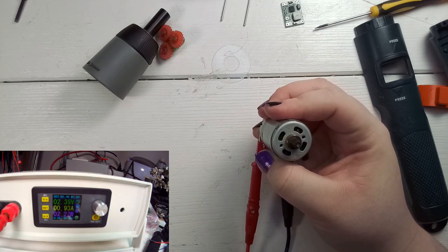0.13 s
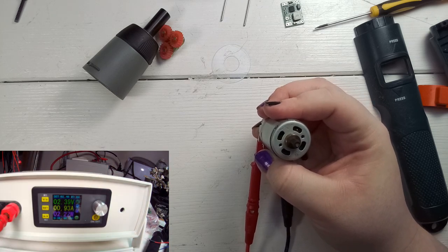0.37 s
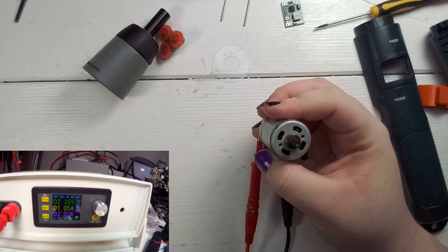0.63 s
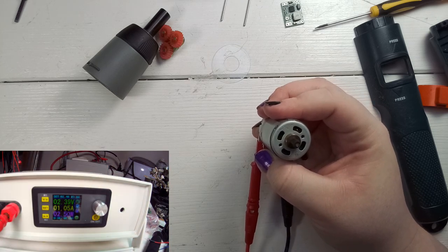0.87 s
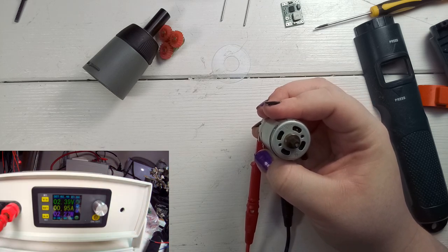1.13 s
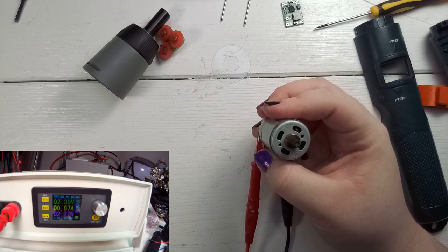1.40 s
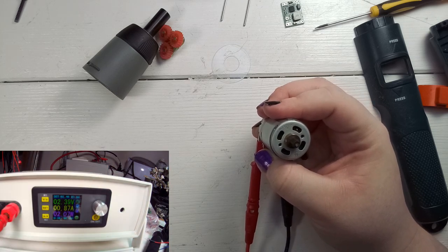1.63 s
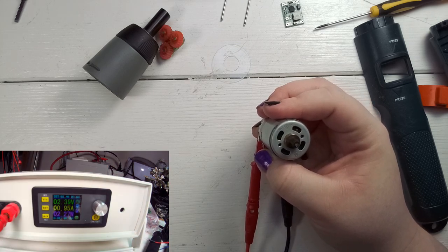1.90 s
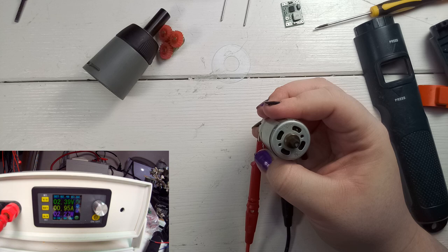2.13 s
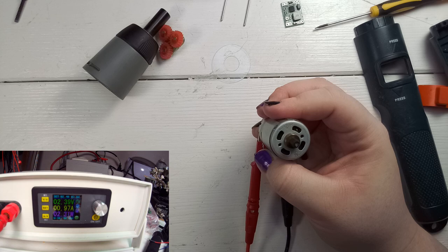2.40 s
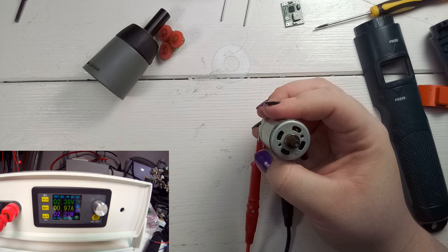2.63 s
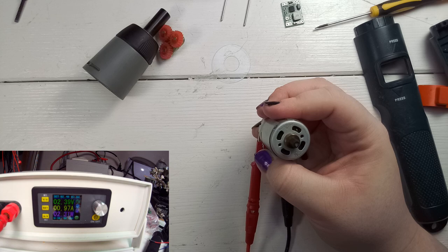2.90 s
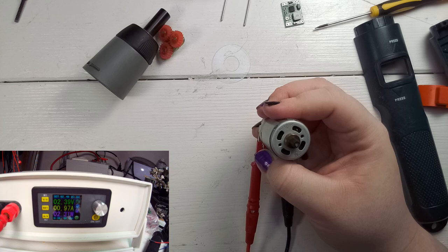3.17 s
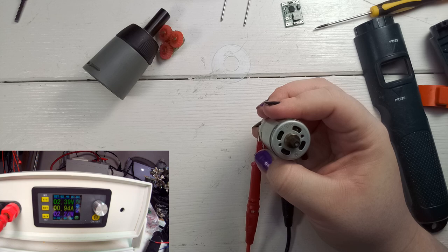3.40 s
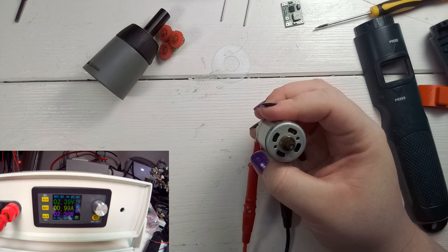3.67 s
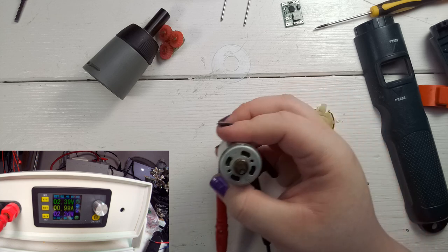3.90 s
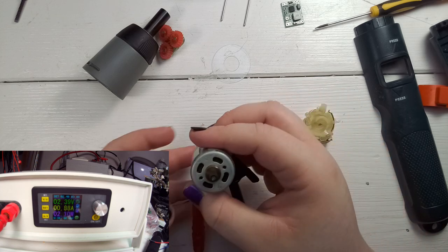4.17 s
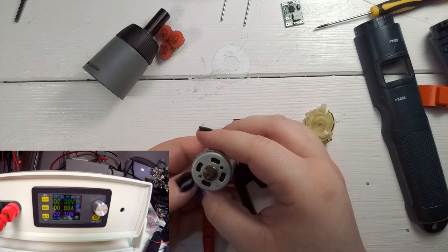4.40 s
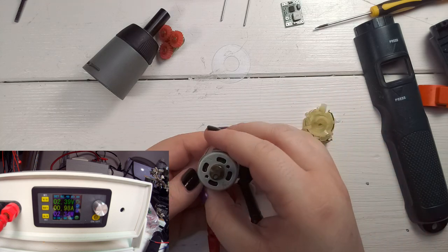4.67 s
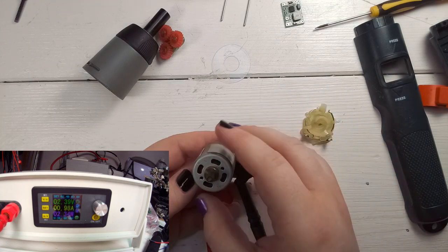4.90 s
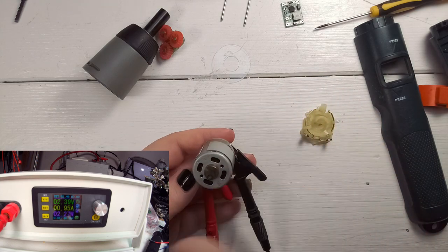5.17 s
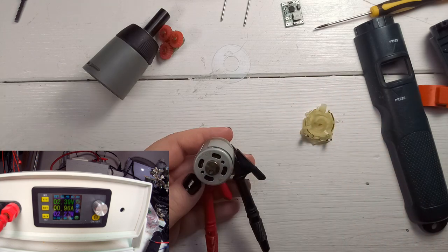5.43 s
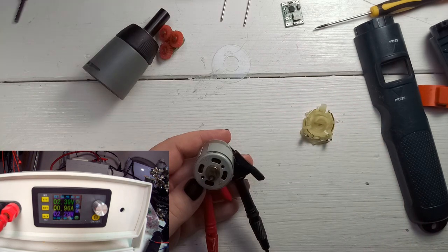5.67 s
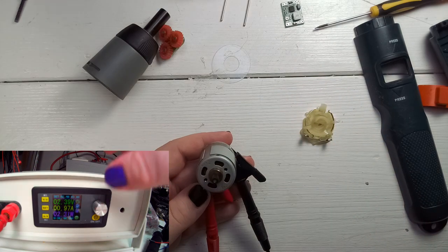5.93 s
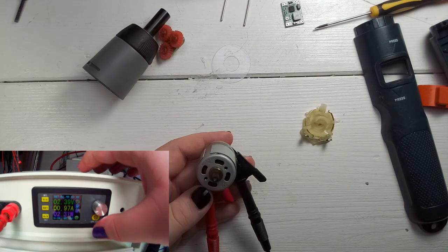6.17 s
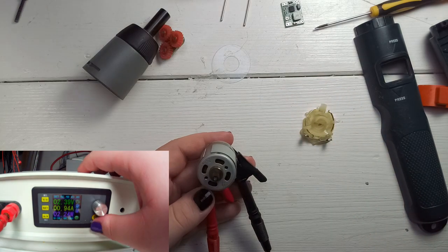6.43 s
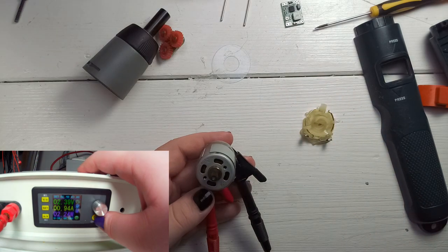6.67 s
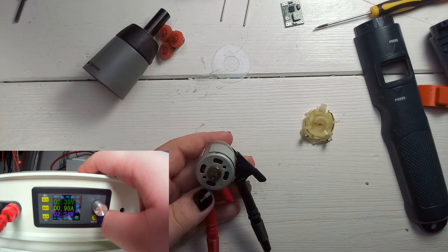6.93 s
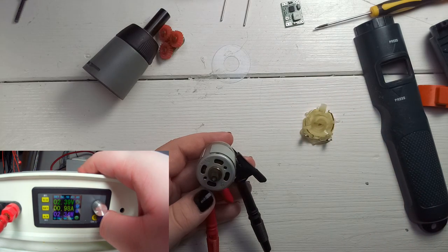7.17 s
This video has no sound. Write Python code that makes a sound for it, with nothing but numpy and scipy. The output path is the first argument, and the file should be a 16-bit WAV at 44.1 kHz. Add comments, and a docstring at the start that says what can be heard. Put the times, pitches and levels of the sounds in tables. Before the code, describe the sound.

Close, dry indoor sound of a tiny motor already spinning without load: rapid brush ticks fused into a hissing, ringing buzz, over a buzzy whine. Pitch rises slightly and wobbles whenever something briefly drags. Halfway through, handling changes the metal ring, with flickers of a coarser octave-lower rasp, light knocks on a bench and soft fabric rubs. The buzz continues to the end, softer, with faint hum and room noise.

```python
"""Small brushed motor held in a hand

A small brushed motor runs unloaded above a bench, its speed creeping up and sagging now and then.
Brushes tick over the commutator bars and scrape, ringing the steel can; clean tones follow the shaft.
The hand turns and partly covers the motor, which changes the ring and the balance of the tones.
Mains hum from sine waves and a faint room floor from filtered noise lie underneath.
Damped swings and clicks make a few bumps on the bench; filtered noise makes a sleeve's rustle."""
import sys
import numpy as np
from scipy import signal
from scipy.fft import rfft, irfft
from scipy.io import wavfile
from scipy.ndimage import uniform_filter1d

SR = 44100
rng = np.random.default_rng(int(sys.argv[2]) if len(sys.argv) > 2 else 0)


def elevation(decibels):
    """Turn decibel levels (scalar or array-like) into linear amplitude ratios."""
    levels = np.asarray(decibels, float)
    return 10 ** (levels / 20)


def to_wav(s):
    """Save 16-bit WAV."""
    ch = np.atleast_2d(s).T  # columns
    pcm = np.round(np.clip(ch, -1, 1) * 32767)  # PCM
    wavfile.write(sys.argv[1], SR, pcm.astype(np.int16))


N = 322282

# Speed of the free shaft, before drags and wobble: time_s, speed_turns_per_s
SHAFT_SPEED = [(0, 142.9), (.12, 145.2), (.5, 145.7), (.68, 148.4), (1.12, 148.8), (1.3, 152.1),
               (2.6, 155.4), (3.6, 155.1), (4.8, 158.2), (5.6, 157.2), (5.78, 158.8), (6.3, 160.4),
               (7.14, 161.1), (7.22, 162.4)]
# Something drags on the rotor, then lets go: release_s, lost_turns_per_s, drag_s, recovery_s
DRAGS = [(.826, 5.1, .131, .035), (1.177, 2.7, .025, .085), (1.418, 3, .157, .063),
         (1.564, 5.6, .106, .065), (1.925, 2.5, .029, .11), (2.075, 3.9, .061, .134),
         (2.429, 5.1, .046, .051), (3.25, 1.6, .022, .02), (3.711, 3.9, .045, .281),
         (4.119, 4.3, .139, .105), (4.281, 7.7, .077, .07), (4.415, 5.1, .052, .3),
         (5.331, 7.4, .075, .054), (6.166, 2.1, .078, .055), (6.411, 7.6, .059, .051)]
# How the motor is held: time_s, grip (0 facing the microphone, 1 cupped in both hands,
# 2 held low and aside), limp (0 to 1, how far the ticks alternate strong and weak)
HAND_GRIP = [(0, .1, .02), (3.9, .08, .02), (4.25, .4, .05), (4.55, 1, .05), (4.7, 1, .55), (4.83, 1, .5),
             (4.9, 1, .1), (5.12, 1, .1), (5.18, 1, .65), (5.3, 1, .55), (5.4, 1.05, .1), (5.6, 1.15, .1),
             (5.67, 1.2, .5), (5.9, 1.3, .55), (5.93, 1.3, .08), (6.04, 1.4, .1), (6.1, 1.9, .5),
             (6.4, 1.95, .2), (6.6, 1.95, .5), (7.15, 1.95, .5), (7.22, 1.95, .1)]
# Brush ticks within one turn: place_turns, level_db (relative)
BRUSH_TICKS = [(0, 0), (.23, -5), (0.52, -9), (0.85, -7)]
# Ring of the can, one list for each whole grip: pitch_hz, level_db (relative)
CAN_RING = [
    [(2120, -46), (3600, -13), (3970, -23.5), (4790, -14), (5190, -27), (5800, -14.5), (6250, -2.5),
     (6700, 1.5), (7560, -5), (8180, -16), (9300, -8), (13600, -33), (14400, -18), (15400, -17)],
    [(2120, -28), (3600, -21.5), (4590, -21.5), (4850, -8.5), (5300, -13.5), (5720, -6.5), (6340, -4),
     (7290, -9.5), (7840, -17.5), (10900, -25.5), (12100, -31.5), (15400, -29.5)],
    [(2120, -57), (3600, -20.5), (4400, -17), (4970, 2), (5540, -8.5), (6300, 1), (7030, 1), (7330, -6),
     (9470, -3.5), (13500, -29.5), (15400, -15)],
]
# Level of the ticks and scrape as rung by the can: time_s, level_db
BUZZ_LEVEL = [(0.0, -41), (1.55, -38.5), (1.61, -40.5), (1.85, -38.5), (2.56, -38.5), (2.73, -37),
              (3.4, -38), (3.58, -36.5), (4.34, -41), (4.56, -37), (4.82, -39), (5.01, -36), (5.05, -40),
              (5.19, -38), (5.39, -43), (5.45, -39), (5.68, -42.5), (6.07, -45), (7.31, -45.5)]
# Level of one mode of the can, freed or damped by the fingers: time_s, level_db
WHISTLE_LEVEL = [(4.4, -63), (4.52, -45), (5.25, -61), (5.37, -77), (5.45, -55), (6.02, -48.5), (6.08, -63),
                 (7.3, -54.5)]
# Magnetic and bearing tones, one row per multiple of the shaft speed from the third up:
# facing_db, cupped_db, aside_db (relative)
SHAFT_TONES = [(-14.5, -10, -15), (-11.5, -8, -26), (-19, -7, -11), (-18, -17, -10.5), (-6, -7.5, -10.5),
               (-34, -58, -52), (4, -4, 0.5), (1, -4, -8.5), (-3.5, -1.5, -3), (1.5, -13, -4.5),
               (-1.5, -1, -17.5), (-12.5, -5.5, -11), (-5.5, -0.5, -0.5), (-4, -8, -7), (-11.5, 2.5, -22),
               (-32, -12, -3.5), (-11.5, -7, -6), (-0.5, -3, 0.5), (-14, -31, -20), (4, -17, -13)]
# Spells in which one tone comes up or drops out: multiple, start_s, end_s, change_db
TONE_SPELLS = [(6, .56, 1.6, 9), (19, 5.92, 6.07, 11), (7, 0, 1, -7), (21, 1.65, 3.7, 6),
               (22, 2.45, 3.7, -9), (19, 6.26, 7.4, 10), (9, 6.12, 6.36, 5)]
# Level of all the shaft tones together: time_s, level_db
TONE_LEVEL = [(0, -51), (2.4, -51), (2.6, -51), (3.65, -51), (4.15, -55.5), (4.6, -55.5), (7.31, -53)]
# Mains hum: pitch_hz, level_db (rms)
MAINS_HUM = [(50, -71), (150, -70), (250, -76.5), (350, -82), (450, -78), (650, -80)]
# Colour of the room floor: pitch_hz, level_db (relative, per Hz)
FLOOR_COLOUR = [(20, -25), (60, -8), (120, -13), (300, -7), (700, -5), (1100, -11), (3500, -17),
                (6000, -40)]
# Bumps on the bench: start_s, level_db, swing_hz, click_top_hz, fade_s (time to fall 60 dB)
BENCH_BUMPS = [(3.743, -41.5, 325, 900, 0.036), (4.175, -34, 1720, 3800, 0.015),
               (4.404, -41, 337, 600, 0.028), (5.154, -36, 160, 1710, 0.0098),
               (5.43, -33.5, 330, 875, 0.011), (6.075, -45, 100, 250, 0.054),
               (6.277, -40, 720, 1100, 0.007)]
# Sleeve strokes on the bench: start_s, length_s, dull_rub_db, bright_swish_db
SLEEVE_STROKES = [(3.75, 0.33, -64.5, -59.5), (4.007, 0.6, -63.5, -59), (5.244, 0.66, -58, -54.5),
                  (5.602, 0.81, -54.5, -54), (6.176, 0.68, -64, -61), (6.53, 1, -66.5, -59.5)]
# Colour of the dull rub: pitch_hz, level_db (relative, per Hz)
RUB_COLOUR = [(30, -14), (80, -1), (300, -4), (750, -1), (1200, -11), (2800, -14), (4000, -28), (8000, -60)]
# Colour of the bright swish: pitch_hz, level_db (relative, per Hz)
SWISH_COLOUR = [(600, -42.5), (1400, 2.5), (2500, -1), (3600, 2.5), (6000, -51)]


def evened(x):
    """Scales to rms 1."""
    return x / np.sqrt(np.mean(x ** 2) + 1e-20)


def curve(rows):
    """Draws each column of a table as a line through time, sample by sample."""
    s, *columns = np.transpose(rows)
    return [np.interp(np.arange(N) / SR, s, column) for column in columns]


def colour(x, points, causal=True):
    """Filters to a given spectrum; its ring follows the blow, or swells and fades evenly."""
    hz, db = np.transpose(points)
    f = np.abs(np.fft.fftfreq(4096, 1 / SR))
    log_gain = np.log(elevation(np.interp(np.log(f + 1), np.log(hz + 1), db)))
    # the Hilbert transform gives the phase that puts the ring after the blow
    spectrum = np.exp(np.conj(signal.hilbert(log_gain)) if causal else log_gain)
    taps = np.fft.fftshift(np.fft.ifft(spectrum).real)
    return signal.oaconvolve(x, taps / np.linalg.norm(taps), "same")


def drift(count, s, fastest_hz):
    """Slow random wandering of rms 1 from summed sines, one row each, at the times s."""
    hz = np.geomspace(.2, fastest_hz, 16)[:, None]
    start = rng.random((count, 16, 1))
    waves = np.sin(2 * np.pi * (hz * s + start)) / hz ** .15
    return evened(waves.sum(1))


def shaft():
    """Adds up speed into turns so far, and finds how hard a catching brush brakes the rotor."""
    catch_s = .05  # drags shorter than this are a brush catching
    t = np.arange(N) / SR
    speed, = curve(SHAFT_SPEED)
    braking = np.zeros(N)  # turns per s per s
    for release, lost, drag_s, recovery_s in DRAGS:
        slowing = np.clip(1 + (t - release) / drag_s, 0, 1)
        recovering = np.exp(-abs(t - release) / recovery_s)
        speed = speed - lost * np.where(t < release, slowing, recovering)
        dragging = (t < release) * (t > release - drag_s)
        braking = braking + lost / drag_s * dragging * (drag_s < catch_s)
    # the light rotor never runs quite evenly
    wander = uniform_filter1d(uniform_filter1d(rng.standard_normal(N), 1500), 800)
    wobble = 1 + .0016 * evened(wander)
    turns = np.cumsum(uniform_filter1d(speed, 1000) * wobble) / SR
    return turns, uniform_filter1d(braking, 400)


def brush_ticks(turns, limp):
    """Short clicks that repeat every turn, creeping in place and strength: all, and the main one."""
    limp_share = .9  # share of the limp that reaches the ticks
    place, db = np.transpose(BRUSH_TICKS)[:, :, None]
    count = len(BRUSH_TICKS)
    whole = np.arange(int(turns[-1]) - 1)
    s = np.interp(whole, turns, np.arange(N) / SR)
    scatter = rng.standard_normal((len(whole), 2, count)).T
    angle = whole + place + .003 * drift(count, s, 3) + .0004 * scatter[:, 0]
    size = elevation(db + 1.1 * drift(count, s, 6) + .4 * scatter[:, 1])
    # each bar ticks strong and weak in turn: this adds lines halfway between the multiples
    alternate = (-1) ** (whole + np.arange(count)[:, None])
    size *= 1 + alternate * limp_share * limp[(s * SR).astype(int)]
    # a windowed sinc places each click between samples
    at = np.interp(angle, turns, np.arange(N))[..., None] + 16
    near = np.floor(at) + np.arange(-15, 17)
    window = np.cos(np.pi * (near - at) / 32) ** 2
    clicks = size[..., None] * np.sinc(near - at) * window
    every, main = np.zeros((2, N + 64))
    np.add.at(every, near.astype(int), clicks)
    np.add.at(main, near[0].astype(int), clicks[0])
    return evened(every[:N]), evened(main[:N])


def brush_scrape(turns, grip, limp, braking):
    """Friction hiss, strongest just after the main tick of each turn and when a brush catches."""
    # level against the ticks: 1 dB per grip, 5 dB per limp, .085 dB per unit of braking
    scrape_db = -12 + 1 * grip + 5 * limp + .085 * braking
    pulse = 1 + .6 * np.cos(2 * np.pi * turns - 1)
    return elevation(scrape_db) * pulse * rng.standard_normal(N)


def shell(x, ring_db, count=3):
    """The can's dense short ring scatters each tick; the ring changes slowly as fingers shift."""
    t = np.arange(2500) / SR
    rings = rfft(rng.standard_normal((count, len(t))) * elevation(-60 * t / .055))
    # many modes overlap, so no single one stands out far
    rings = irfft(rings / abs(rings) ** .93)
    rings /= np.linalg.norm(rings, axis=1, keepdims=True)
    s = np.arange(0, N + 256, 256) / SR
    weights = drift(count, s, 4)
    weights /= np.linalg.norm(weights, axis=0)
    # the top of each tick only leaves through the can
    direct = signal.lfilter(*signal.butter(4, 7900, fs=SR), x)
    scattered = np.zeros(N)
    for weight, ring in zip(weights, rings):
        scattered += np.interp(np.arange(N) / SR, s, weight) * signal.oaconvolve(x, ring)[:N]
    return direct + elevation(ring_db) * scattered


def can_buzz(ticks, scrape, grip):
    """Ticks and scrape ring the can, whose resonances blend from one grip to the next."""
    drive = shell(ticks + scrape, -5.5 + 5.5 * grip)  # more scatter in covering hands
    ring = np.zeros(N)
    for k, can in enumerate(CAN_RING):
        share = np.clip(1 - abs(grip - k), 0, 1)
        ring += np.sqrt(share) * evened(colour(drive, can, causal=False))
    buzz_db, = curve(BUZZ_LEVEL)
    # the ring follows the buzz level
    return elevation(buzz_db) * ring / np.sqrt(uniform_filter1d(ring ** 2, 6000))


def can_whistle(main_tick, scrape):
    """One mode of the can, a narrow resonance rung by the main tick and the scrape."""
    whistle_hz, width_hz = 4990, 330  # width of each of two passes
    mode = signal.iirpeak(whistle_hz, whistle_hz / width_hz, SR)
    ringing = signal.lfilter(*mode, signal.lfilter(*mode, main_tick + scrape))
    level_db, = curve(WHISTLE_LEVEL)
    return elevation(level_db) * evened(ringing)


def rotor_tones(turns, grip, limp):
    """Clean tones on low multiples of the shaft speed, each swelling and fading on its own."""
    lowest_multiple = 3
    lag, spread = .4, .027  # shares of a turn: tones line up this long after the main tick, or a bit before
    s = np.arange(0, N + 256, 256) / SR
    held = grip[::256]
    steps = len(held)
    waver_db = np.interp(held, range(2), (2.5, 3.5))  # less steady in moving hands
    tones = np.zeros(N)
    wavers = drift(len(SHAFT_TONES), s, 12)
    for k, (by_grip_db, waver) in enumerate(zip(SHAFT_TONES, wavers), lowest_multiple):
        db = np.interp(held, range(3), by_grip_db) + waver_db * waver[:steps]
        for multiple, start, end, change_db in TONE_SPELLS:
            if multiple == k:
                inside = 1. * (s > start) * (s < end)
                db = db + change_db * uniform_filter1d(inside, size=9)[:steps]
        # the limp shows here too
        limping = 1 + .5 * limp * np.cos(np.pi * turns + 2 * np.pi * rng.random())
        strength = np.interp(np.arange(N) / SR, s[:steps], elevation(db))
        lined_up = turns - lag + spread * rng.random()
        tones += limping * strength * np.sin(2 * np.pi * k * lined_up)
    level_db, = curve(TONE_LEVEL)
    # the sum follows the tone level
    return elevation(level_db) * tones / np.sqrt(uniform_filter1d(tones ** 2, 4000))


def mains_hum():
    """Steady sine waves at the mains pitch and its multiples."""
    t = np.arange(N) / SR
    return sum(np.sqrt(2) * elevation(db) * np.sin(2 * np.pi * (hz * t + rng.random())) for hz, db in MAINS_HUM)


def room_floor():
    """Steady filtered noise at -71 dB rms."""
    return elevation(-71) * colour(rng.standard_normal(N), FLOOR_COLOUR)


def bumps():
    """Dull knocks: a damped swing of the bench, a short crackle and a snap, fading together."""
    out = np.zeros(N)
    t = np.arange(SR // 5) / SR
    for start, level_db, swing_hz, top_hz, fade_s in BENCH_BUMPS:
        lowpass = signal.butter(3, top_hz, fs=SR)
        crackle = evened(signal.lfilter(*lowpass, rng.standard_normal(len(t))))
        snap = signal.lfilter(*lowpass, t == 0)
        swing = np.sin(2 * np.pi * swing_hz * t) * np.tanh(swing_hz * t)
        bump = (swing + .5 * crackle + snap / snap.max()) * elevation(level_db - 60 * t / fade_s)
        highpass = signal.butter(2, .15 * swing_hz, "high", fs=SR)
        out[round(start * SR):][:len(t)] += signal.lfilter(*highpass, bump)
    return out


def rustle():
    """Lumpy noise of rubbing fibres, a dull rub and a bright swish, swelling with each stroke."""
    t = np.arange(N) / SR
    rub, swish = np.zeros((2, N))
    for start, length, rub_db, swish_db in SLEEVE_STROKES:
        stroke = np.sin(np.pi * np.clip((t - start) / length, 0, 1)) ** 2
        rub += elevation(rub_db) * stroke
        swish += elevation(swish_db) * stroke
    lumps = elevation(1.2 * evened(uniform_filter1d(rng.standard_normal(N), 1500)))
    fibres = rng.standard_normal(N) * lumps
    return rub * evened(colour(fibres, RUB_COLOUR)) + swish * evened(colour(fibres, SWISH_COLOUR))


def scene():
    """Adds motor, room and handling at one microphone."""
    turns, braking = shaft()
    grip, limp = curve(HAND_GRIP)
    ticks, main_tick = brush_ticks(turns, limp)
    scrape = brush_scrape(turns, grip, limp, braking)
    motor = can_buzz(ticks, scrape, grip) + can_whistle(main_tick, scrape) + rotor_tones(turns, grip, limp)
    mix = motor + mains_hum() + room_floor() + bumps() + rustle()
    return mix[None]


def low_pass(x):
    """Removes everything above the highest recorded frequency."""
    return signal.sosfilt(signal.butter(12, 16900, fs=SR, output="sos"), x)


def record(dry):
    """Cuts the treble above 15.7 kHz with a steep low-pass filter."""
    lowpass = signal.firwin(511, 15700, window=("kaiser", 9), fs=SR)
    limited = signal.oaconvolve(dry, lowpass[None], "same")
    return low_pass(limited)


dry = scene()
out = record(dry)
to_wav(out)
```